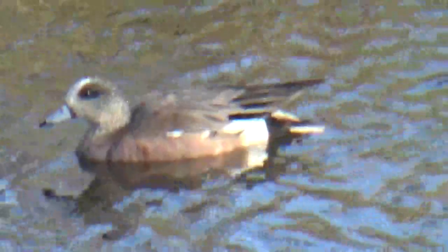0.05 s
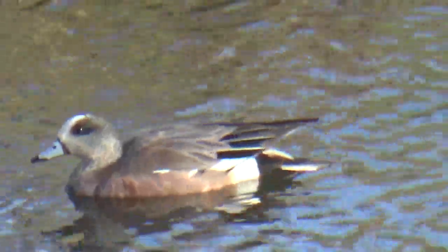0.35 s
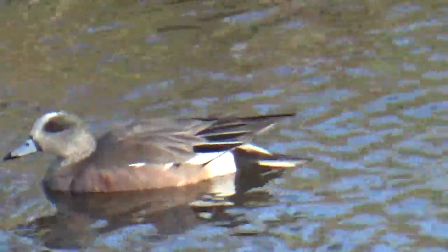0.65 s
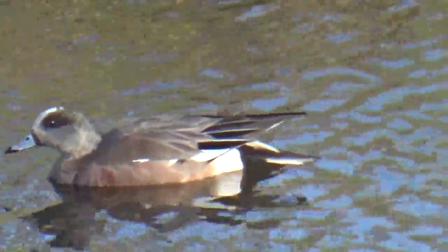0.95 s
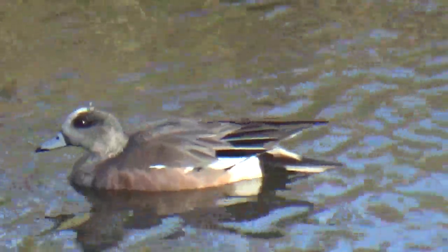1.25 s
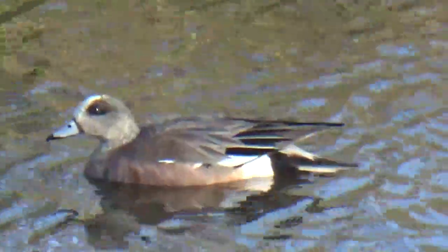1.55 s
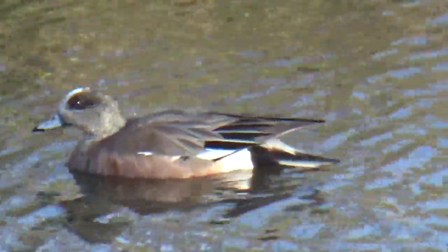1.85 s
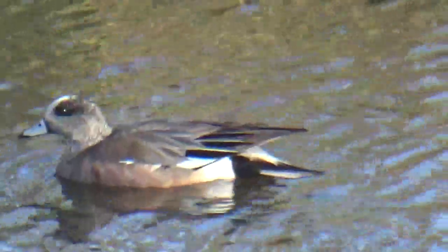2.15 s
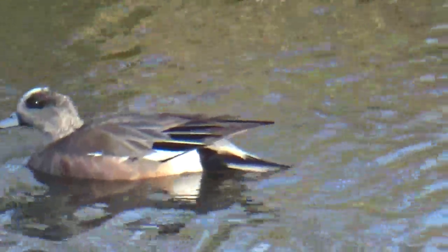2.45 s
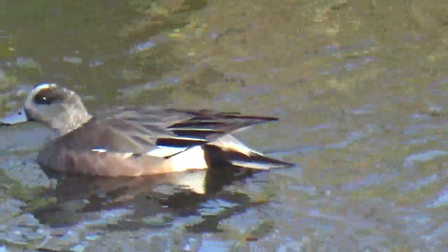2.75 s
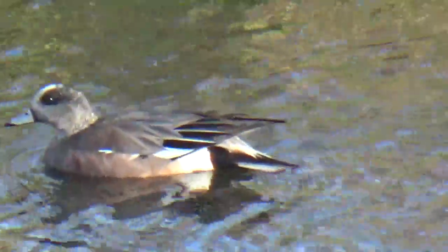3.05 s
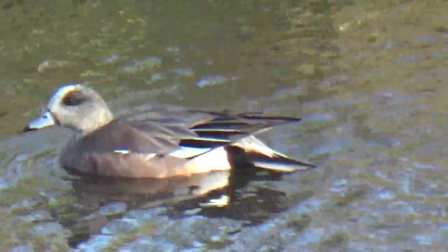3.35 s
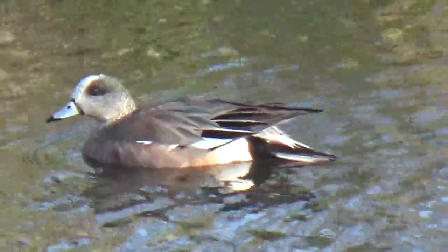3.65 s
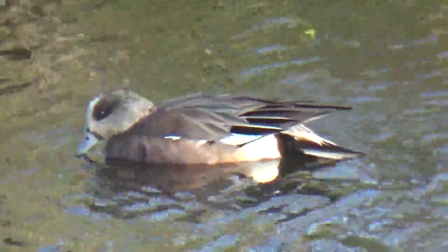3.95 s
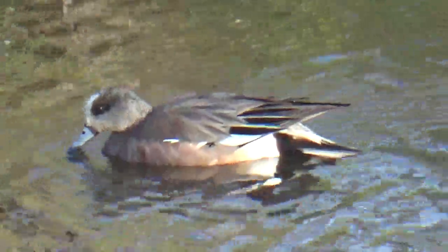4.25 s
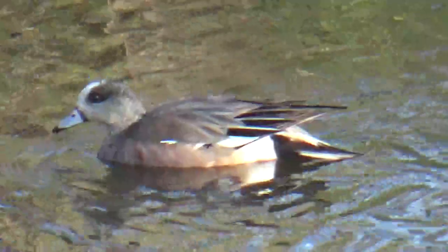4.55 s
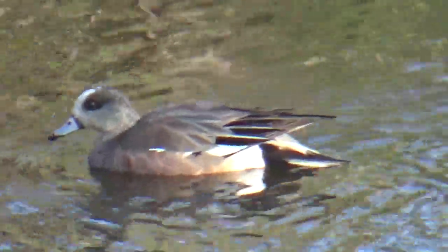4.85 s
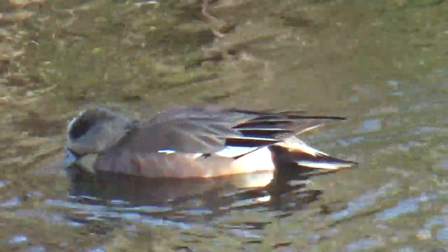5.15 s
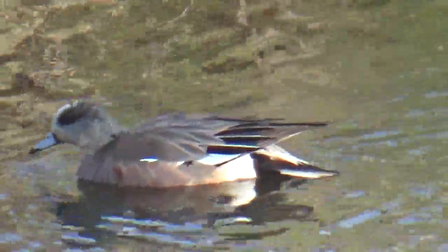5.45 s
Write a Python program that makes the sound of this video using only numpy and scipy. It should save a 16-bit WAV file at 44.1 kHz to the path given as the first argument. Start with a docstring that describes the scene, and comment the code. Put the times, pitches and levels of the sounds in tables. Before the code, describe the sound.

Gusty wind rumbles and thumps on the microphone beside a pond, with one brief, faint blackbird song and tiny water ticks.

```python
"""Gusts buffet a small stereo microphone at the edge of a pond: big eddies rumble and thump on its
ports, and small ones rush, puff and crackle on top. Off to the left a blackbird sings once (a whistle,
a buzzing trill, a closing note); a smaller bird twitters far off, and reeds and trees scatter both.
Water ticks and splashes faintly, something dry rustles close by, and behind it all lies a far,
even wash of traffic."""
import sys
import numpy as np
from scipy import signal
from scipy.io import wavfile
from scipy.ndimage import uniform_filter1d

SR = 44100
rng = np.random.default_rng(int(sys.argv[2]) if len(sys.argv) > 2 else 0)


def output_pcm(signal):
    """Save a mono or channel-first signal as 16-bit PCM at the path in sys.argv[1].

    Samples are clipped to [-1, 1] before scaling.
    """
    pcm = np.clip(np.atleast_2d(signal).T, -1, 1) * 32767
    wavfile.write(sys.argv[1], SR, np.round(pcm).astype(np.int16))


N = 242991
TIME = np.arange(N) / SR


def from_db(db):
    """Decibels to gain."""
    return 10 ** (np.asarray(db) / 20)


def rms_one(x):
    """Scale to unit power."""
    return x / np.sqrt(np.mean(x ** 2) + 1e-20)


def at_hz(points, hz):
    """Read a curve on a log-frequency axis."""
    freqs, values = np.array(points).T
    return np.interp(np.log(hz), np.log(freqs), values)


def pan(side_db):
    """Channel gains that put the left side_db above the right."""
    return from_db(np.array([[side_db], [-side_db]]) / 2)


def band(x, low_hz, high_hz, order=2):
    """Butterworth band-pass."""
    edges = [low_hz, min(high_hz, SR / 2 - 100)]
    return signal.sosfilt(signal.butter(order, edges, "band", fs=SR, output="sos"), x)


def drift(rate_hz):
    """A smooth random wander of spread 1, mostly slower than rate_hz."""
    pole = np.exp(-40 * np.pi * rate_hz / SR)
    slow = signal.lfilter([1], [1, -2 * pole, pole * pole], rng.standard_normal(N // 20 + 2002))[2000:]
    return np.interp(np.arange(N) / 20, np.arange(len(slow)), rms_one(slow))


def stereo(pair, alike):
    """Two unrelated noises become left and right with a given correlation."""
    return np.sqrt((1 + alike) / 2) * pair[0] + np.sqrt((1 - alike) / 2) * pair[1] * [[1], [-1]]


def noise_bands(spectrum, likeness):
    """Half-octave bands of stereo noise as (centre Hz, sound); together they have unit power."""
    edges = 18 * 2 ** np.arange(0, 9.6, .5)
    centres = np.sqrt(edges[1:] * edges[:-1])
    white = rng.standard_normal((2, 2, N + SR // 4))
    gains = from_db(at_hz(spectrum, centres)) * np.sqrt(np.diff(edges))
    gains = gains / np.linalg.norm(gains)
    for k, hz in enumerate(centres):
        pair = rms_one(band(white[k % 2], edges[k], edges[k + 1], order=3)[:, -N:])
        yield hz, gains[k] * stereo(pair, at_hz(likeness, hz))


def swell(middle_s, half_s):
    """A bell-shaped rise and fall of height 1."""
    return np.exp(-np.minimum(((TIME - middle_s) / half_s) ** 2, 60))


def steady(x, span_s):
    """Even out a noise's chance swells longer than the span."""
    power = uniform_filter1d(np.mean(x ** 2, axis=0), int(span_s * SR), mode="reflect")
    return x / np.sqrt(power + 1e-12)


# Traffic, far from the pond. Each row: frequency in Hz, relative spectral density in dB.
TRAFFIC_SPECTRUM = [(30, -3), (100, -1), (200, -2), (300, -4), (480, -8), (680, -1), (960, 0),
                    (1600, -12.5), (2400, -24.5), (3500, -28), (6500, -33), (11000, -35.3)]
# Its width at the microphone. Each row: frequency in Hz, left-right correlation.
TRAFFIC_LIKENESS = [(60, 0.92), (600, 0.82), (1200, 0.82), (3000, 0.49), (11000, 0.65)]


def traffic(level_db=-40, waver_db=0.23):
    """Distant traffic and thin hiss, near the centre and wavering a little."""
    wash = sum(x for _, x in noise_bands(TRAFFIC_SPECTRUM, TRAFFIC_LIKENESS))
    return from_db(level_db + waver_db * drift(12)) * wash * pan(-0.72)


# Something dry, close by on the right.
# Each row: middle in seconds, half length in seconds, relative level in dB.
RUSTLES = [(0.258, 0.12, -62), (0.82, .035, -56), (3.424, 0.11, -55), (3.5, 0.046, -49),
           (3.645, 0.058, -48.5), (4.33, 0.315, -60)]


def rustle(grain_db=2.5, low_hz=8200, top_hz=11000):
    """Brief, grainy swishes high in the treble."""
    hiss = stereo(band(rng.standard_normal((2, N)), low_hz, top_hz), 0.44)
    level = sum(from_db(db) * swell(s, half) for s, half, db in RUSTLES)
    return from_db(-8.5) * level * rms_one(hiss * from_db(grain_db * drift(90))) * pan(-2.8)


# Water ticking on the pond, a little left. Each row: start in seconds, relative level in dB,
# lower band edge in Hz, seconds to fall 60 dB.
SPLASHES = [(.277, -47, 4500, .025), (0.645, -39, 2000, 0.014), (.789, -46.5, 4500, 0.037),
            (3.254, -47, 5000, .04), (4.531, -31.5, 3100, 0.031), (4.715, -43.5, 3000, 0.017),
            (4.85, -39, 2600, 0.017), (5.006, -39.5, 3500, 0.0218), (5.279, -49.5, 3000, 0.027),
            (5.456, -37.5, 3200, 0.019)]


def water(top_hz=10500, attack_s=0.0018):
    """Tiny splashes: bright bursts that die within milliseconds."""
    out, spray = 0, stereo(rng.standard_normal((2, N)), 0.77)
    for s, db, low_hz, t60 in SPLASHES:
        age = np.clip(TIME - s, 0, 1)
        envelope = from_db(db - 60 * age / t60) * (1 - np.exp(-age / attack_s))
        out = out + envelope * rms_one(band(spray, low_hz, top_hz))
    return from_db(-1.5) * out * pan(2.2)


def banks(x, wet_db, t60):
    """The direct sound, followed by scatter from reeds and trees round the pond."""
    t = TIME[:SR]
    tail = stereo(rng.standard_normal((2, SR)), 0.51) * from_db(-60 * t / t60) * (1 - np.exp(-t / 0.0024))
    tail = tail / np.sqrt(np.sum(tail ** 2) / 2)
    return x + from_db(wet_db) * signal.fftconvolve(x[None], tail, axes=1)[:, :N]


def notes(rows, waver):
    """Nearly pure gliding bird notes with rounded ends."""
    out, wobble = np.zeros(N), 1 + waver * drift(143)
    for s, length, start_hz, end_hz, db in rows:
        on = (TIME >= s) & (TIME < s + length)
        part = (TIME[on] - s) / length
        hz = (start_hz + (end_hz - start_hz) * part) * wobble[on]
        envelope = from_db(db) * np.abs(np.sin(np.pi * part)) ** 0.49
        out[on] += envelope * np.sin(2 * np.pi * np.cumsum(hz) / SR)
    return out


# The small bird's phrases, far off. Each row: start in seconds, length in seconds, relative level in dB.
TWITTERS = [(0.195, .11, -60), (0.458, .03, -57), (.85, .09, -56.5), (1.105, .13, -55.5), (3.38, .2, -58.5),
            (3.95, .09, -54.5), (4.24, .09, -56.5), (4.483, .03, -53), (5.153, .09, -60)]
# Its one thin rising call. The row: start and length in seconds, first and last pitch in Hz,
# relative level in dB.
THIN_CALL = [(5.478, .032, 7400, 8200, -51)]


def small_bird(slurs_per_s=28, slur_s=0.035, from_hz=5300, to_hz=3960):
    """Runs of one downward slur, each a little off in time and pitch, blurred by distance."""
    beats = [(s, db) for start, length, db in TWITTERS
             for s in np.arange(start, start + length, 1 / slurs_per_s)]
    chance = rng.standard_normal((64, 2)) * [0.0052, .04]   # seconds late, fraction sharp
    slurs = [(s + late, slur_s, from_hz * (1 + sharp), to_hz * (1 + sharp), db)
             for (s, db), (late, sharp) in zip(beats, chance)]
    song = notes(slurs, waver=.06) + notes(THIN_CALL, waver=.01)
    return from_db(-5.5) * banks(song, wet_db=1.5, t60=.3) * pan(1.0)


# One beat of the blackbird's trill. Each row: centre pitch in Hz, sweep in Hz,
# place in the beat from 0 to 1, relative level in dB.
TRILL_SLURS = [(2850, 200, 0.01, -2), (3360, -500, 0.53, -6.5), (3780, 250, 0.12, -6),
               (4420, -800, 0.5, -14), (4980, -500, .35, -9.5)]


def trill(start_s=2.51, end_s=3.04, attack_s=0.026, release_s=0.062, beats_per_s=35, jitter=.03):
    """Each beat of the buzz is a run of short, rasping slurs; the upper ones fade as it goes on."""
    beats = np.cumsum(beats_per_s * (1 + jitter * drift(4.9))) / SR
    out, age = 0, np.clip(TIME - start_s, 0, 1)
    for centre_hz, sweep_hz, place, db in TRILL_SLURS:
        part = (beats - place) % 1
        hz = centre_hz + sweep_hz * (part - .5) + 130 * drift(450)
        faded_db = 10 * np.log2(centre_hz / TRILL_SLURS[0][0]) * age
        pulse = from_db(db - faded_db) * np.sin(np.pi * part) ** 2
        out = out + pulse * np.sin(2 * np.pi * np.cumsum(hz) / SR)
    envelope = np.clip(np.minimum(age / attack_s, (end_s - TIME) / release_s), 0, 1)
    return from_db(-47.5) * envelope * out


# The blackbird's whistles, left of the microphone. Each row: start and length in seconds,
# first and last pitch in Hz, relative level in dB.
WHISTLES = [(2.43, .03, 2350, 2400, -56), (2.459, .035, 2420, 2480, -46), (2.495, .014, 3330, 3480, -44),
            (2.513, .032, 3430, 3390, -51), (3.05, .06, 2400, 2370, -39), (3.062, .026, 2100, 2010, -48),
            (3.165, .085, 2390, 2390, -53), (3.176, .034, 5085, 5065, -57)]
# The quick downward zips that open its trill. Each row reads as for the whistles.
ZIPS = [(2.49, .007, 5200, 4000, -52), (2.506, .008, 5200, 3600, -48)]


def blackbird():
    """Whistles before and after a buzzing trill, all scattered by the banks."""
    whistles = banks(notes(WHISTLES, waver=.007), wet_db=-5, t60=.8)
    buzz = banks(trill() + notes(ZIPS, waver=.03), wet_db=1, t60=.35)
    return (from_db(-1.0) * whistles + buzz) * pan(6.6)


# Single eddies right on the microphone. Each row: middle in seconds, relative level in dB,
# left over right in dB.
THUMPS = [(1.159, -16, -4), (1.784, -25, -3), (2.076, -18, -11), (3.154, -15, 2), (3.65, -17, 12),
          (4.185, -13.5, -11.5), (4.614, -13.5, 14), (4.705, -13, -9), (5.041, -18.5, 6.5),
          (5.286, -19, -15)]


def thumps(half_s=0.0011, pitch_hz=300):
    """A strong eddy is one swing of pressure that meets each port in its own way."""
    out, chance = 0, rng.standard_normal((len(THUMPS), 3))
    for (s, db, side_db), (detune_db, phase, skew) in zip(THUMPS, chance):
        port_phase = np.pi * phase + .5 * skew * np.array([[1], [-1]])
        swing = np.sin(2 * np.pi * pitch_hz * from_db(detune_db) * (TIME - s) + port_phase)
        out = out + from_db(db) * pan(side_db) * swell(s, half_s) * swing
    return from_db(7.0) * out


# Eddies breaking up at the ports. Each row: middle in seconds, half length in seconds,
# relative level in dB.
PUFFS = [(1.012, 0.0031, -40.5), (1.135, .008, -43), (1.474, 0.021, -37), (1.541, .018, -35.5),
         (2.028, 0.0044, -29.5), (2.084, 0.0063, -35.5), (2.25, 0.027, -37.5), (3.165, 0.006, -44),
         (3.666, 0.013, -31), (3.749, 0.022, -32), (4.083, 0.014, -38.5), (4.177, 0.0042, -34.5),
         (4.247, 0.0058, -29.5), (4.391, .004, -34.5), (4.59, 0.0047, -30.5), (4.631, 0.016, -30.5),
         (4.72, 0.027, -33), (4.835, 0.0022, -29.5), (4.869, .003, -32), (5.01, 0.013, -37.5),
         (5.139, 0.0026, -37.5), (5.225, 0.0033, -37), (5.282, 0.0033, -27.5), (5.481, 0.017, -35.5)]


def puffs():
    """An eddy breaks up with a bright, tearing puff."""
    torn = steady(stereo(band(rng.standard_normal((2, N)), 630, 2460, order=4), 0), 0.0011)
    # the middle of a puff pushes one port while it pulls the other
    pushed = steady(stereo(band(rng.standard_normal((2, N)), 460, 790), -0.16), 0.018)
    level = sum(from_db(db) * swell(s, half) for s, half, db in PUFFS)
    return level * (from_db(-4.0) * torn + from_db(6.5) * pushed)


def small_eddies(over_full_db, rush_db=-43, growth=0.67, wake_db=-8, wake_s=0.018):
    """Strength of the small eddies: it grows with the gust and flares round each puff."""
    wakes = sum(from_db(db + wake_db) * swell(s, half + wake_s) for s, half, db in PUFFS)
    return np.hypot(from_db(rush_db + growth * over_full_db), wakes)


def crackle(flow, per_s=300, size_db=4.0):
    """The smallest eddies snap at the ports, more often as the flow quickens."""
    born = rng.random(N) < per_s * np.minimum(rms_one(flow), 3) / SR
    sizes = from_db(size_db * np.minimum(rng.exponential(1, N), 3)) * rng.standard_normal((2, N))
    return flow * rms_one(band(born * sizes, 344, 2480, order=6))


# Gusts reaching the microphone; the last one stays. Each row: time of full strength in seconds,
# hold in seconds, relative level in dB.
GUSTS = [(0.328, 0.029, -42.5), (0.637, 0.057, -29), (0.728, 0.047, -37.5), (0.889, .08, -33),
         (1.01, 0.018, -21.5), (1.11, 0.14, -21), (1.288, 0.24, -22), (1.459, 0.15, -19),
         (1.638, 0.49, -23), (2.038, 0.055, -20.5), (2.177, 0.099, -18.5), (2.31, 0.13, -24),
         (2.492, .53, -29), (2.687, 0.051, -22.5), (2.967, 0.19, -25), (3.145, .06, -20),
         (3.453, 2.22, -20)]


def gust_level(breeze_db=-68, rise_db_per_s=324, fall_db_per_s=188, surge_db=2.5, surge_s=0.029):
    """Wind strength in dB: gusts rise, hold and die; the strongest rules and surges round each thump."""
    level = breeze_db
    for s, hold, db in GUSTS:
        before, after = np.maximum(s - TIME, 0), np.maximum(TIME - s - hold, 0)
        level = np.maximum(level, db - rise_db_per_s * before - fall_db_per_s * after)
    return level + surge_db * sum(swell(s, surge_s) for s, _, _ in THUMPS)


# Wind right on the ports, before it is split into deep, body and high layers.
# Each row: frequency in Hz, relative spectral density in dB.
WIND_SPECTRUM = [(20, -27), (42, -9.5), (75, -6), (125, -2.5), (240, 0.5), (340, -2), (480, -7), (680, -11),
                 (960, -12.5), (1500, -15.5), (2300, -30), (3200, -70), (4500, -79), (8000, -81)]
# How alike the two ports hear it. Each row: frequency in Hz, left-right correlation.
WIND_LIKENESS = [(60, 0.71), (130, 0.79), (270, 0.22), (550, -0.26), (1100, -0.3), (2300, 0.69),
                 (4500, 0.38)]


def wind(full_db=-19, deep_hz=95, split_hz=700, deep_follow=0.42, brighten=0.46,
         lumpy_db=1.5, ragged_db=3.5):
    """Big eddies rumble on the ports; faster flow sheds small ones that rush raggedly on top."""
    gust_db, lumps = gust_level(), drift(47)
    deep = body = high = 0
    for hz, x in noise_bands(WIND_SPECTRUM, WIND_LIKENESS):
        large = 1 / (1 + (hz / deep_hz) ** 4)
        small = 1 / (1 + (split_hz / hz) ** 4)
        deep, high = deep + large * x, high + small * x
        if hz < 1500:
            # a weak gust is round and dark, a strong one brighter
            tilt_db = brighten * (gust_db - full_db) * np.log2(hz / 200)
            body = body + (1 - large - small) * from_db(tilt_db) * x
    # the largest eddies stay on through the lulls
    deep_gain = from_db(-8.0 + (deep_follow - 1) * (gust_db + 29.5))
    rumble = deep_gain * steady(deep, .3) + steady(body * from_db(lumpy_db * lumps), .09)
    flow = small_eddies(gust_db - full_db)
    rush = steady(high * from_db(ragged_db * (.5 * lumps + 1.4 * drift(120))), 0.086)
    return from_db(gust_db + 0.5) * rumble + flow * rush + from_db(-7.0) * crackle(flow)


def scene():
    """Wind on the microphone, over the pond's edge and the far traffic."""
    return wind() + thumps() + puffs() + blackbird() + small_bird() + water() + rustle() + traffic()


def record(dry, cutoff_hz=10950):
    """The small microphone's ports resonate in the treble; the top is cut steeply."""
    coloured = dry + from_db(-6) * band(dry, 8000, 9800, order=1)
    return signal.sosfilt(signal.ellip(12, .1, 90, cutoff_hz, fs=SR, output="sos"), coloured)


dry = scene()
out = record(dry)
output_pcm(out)
```